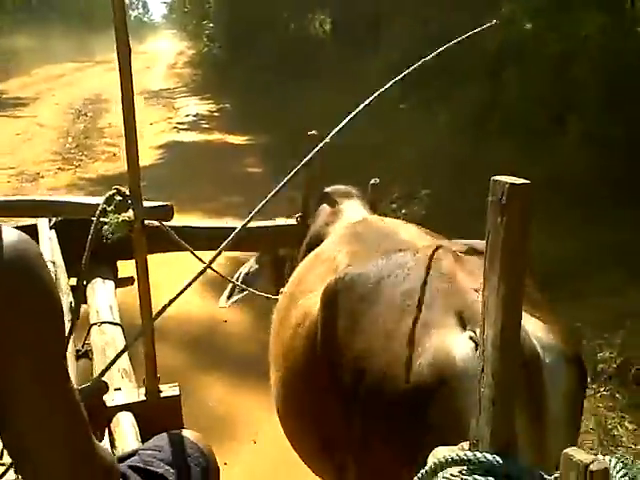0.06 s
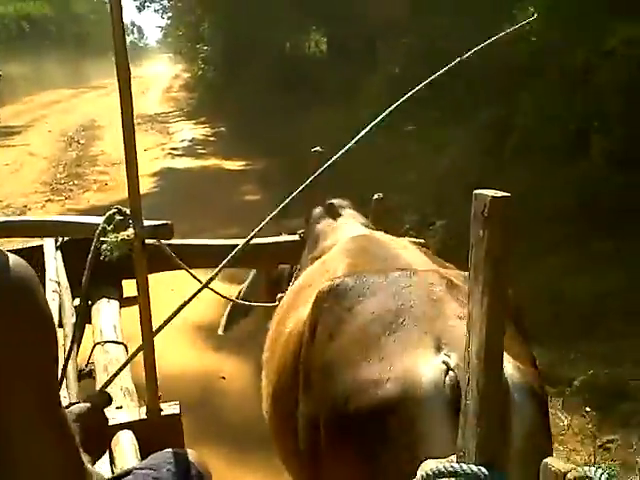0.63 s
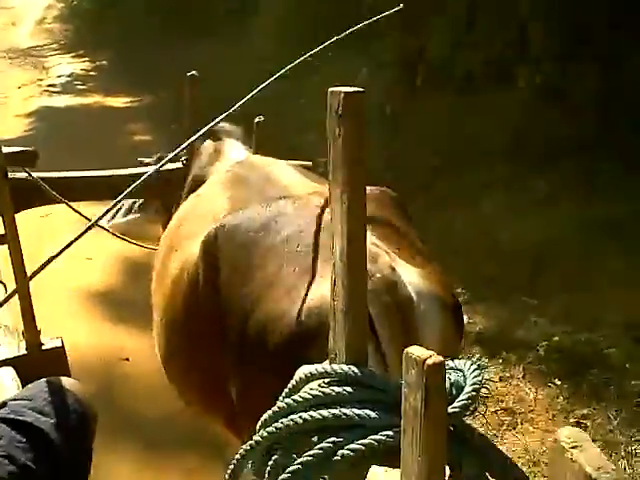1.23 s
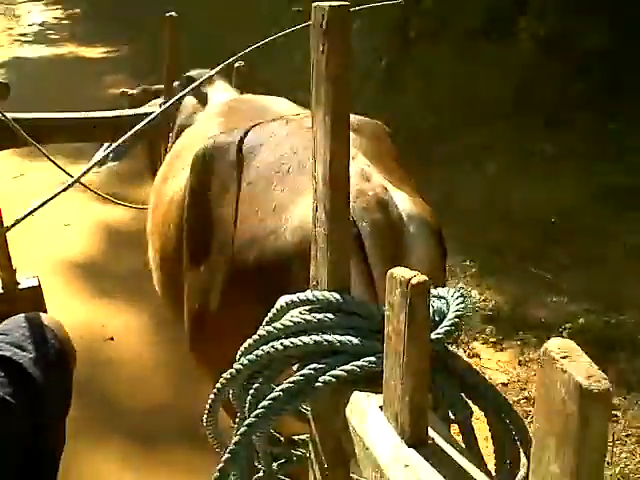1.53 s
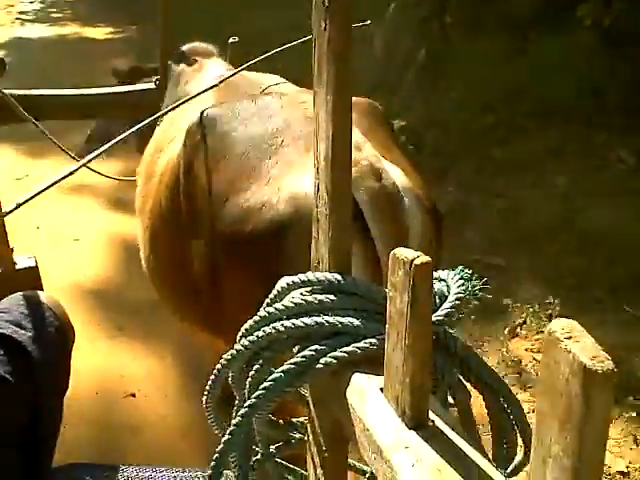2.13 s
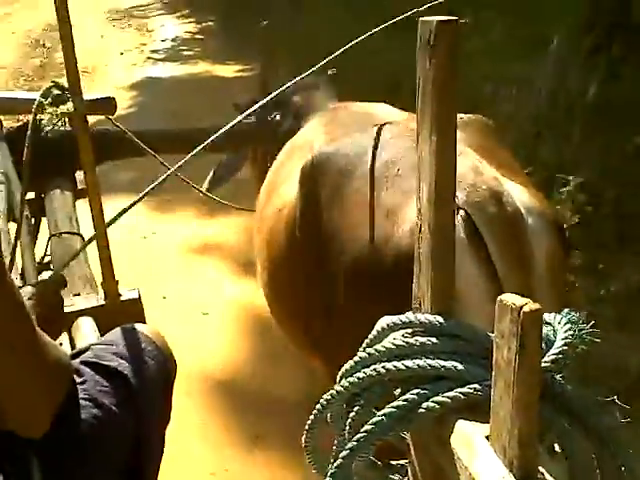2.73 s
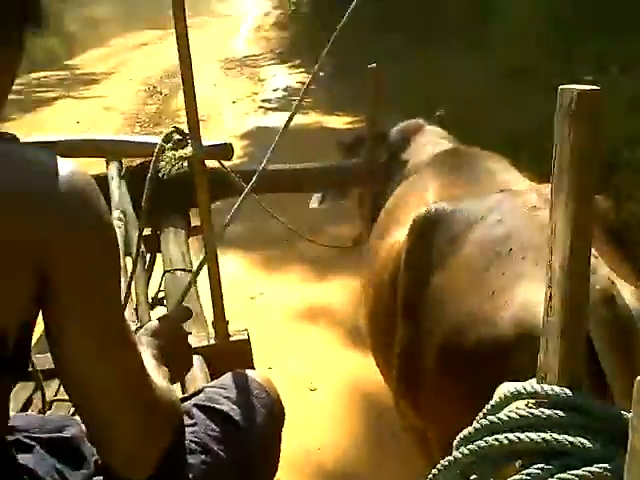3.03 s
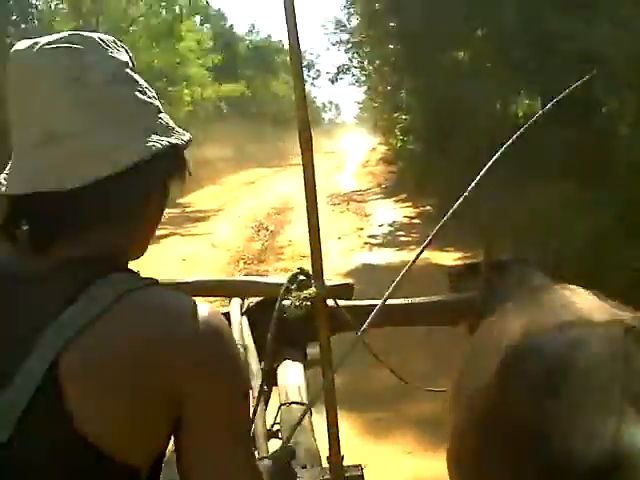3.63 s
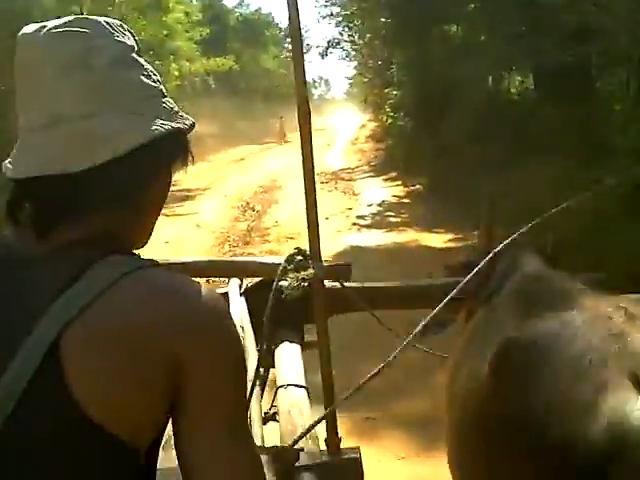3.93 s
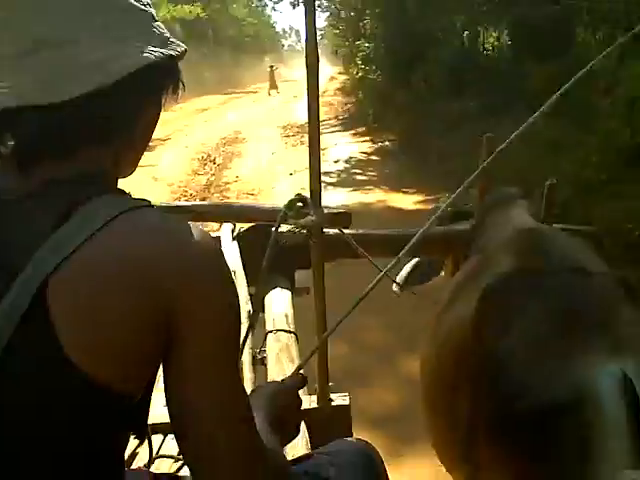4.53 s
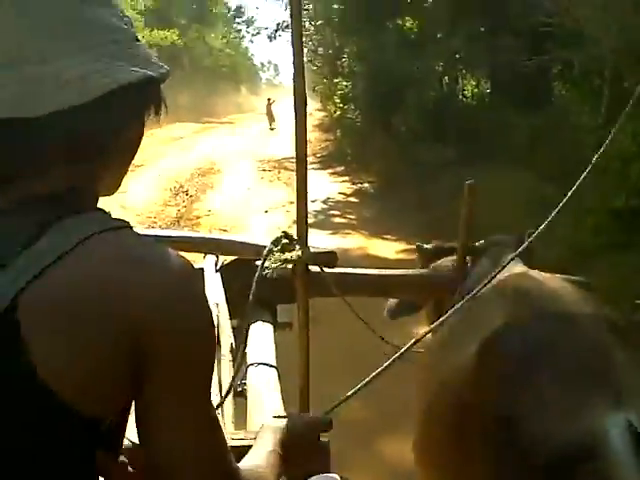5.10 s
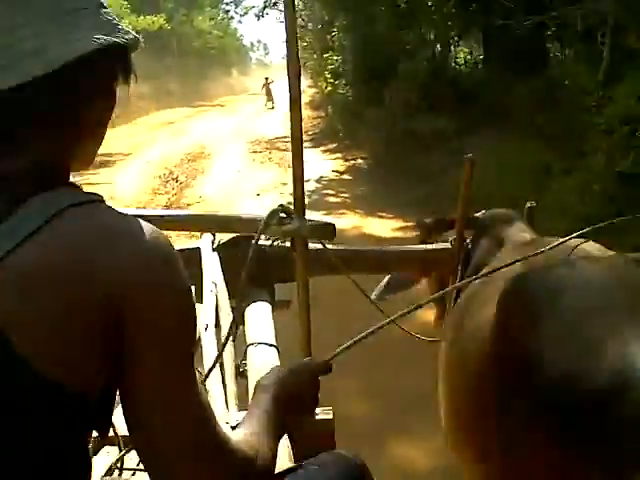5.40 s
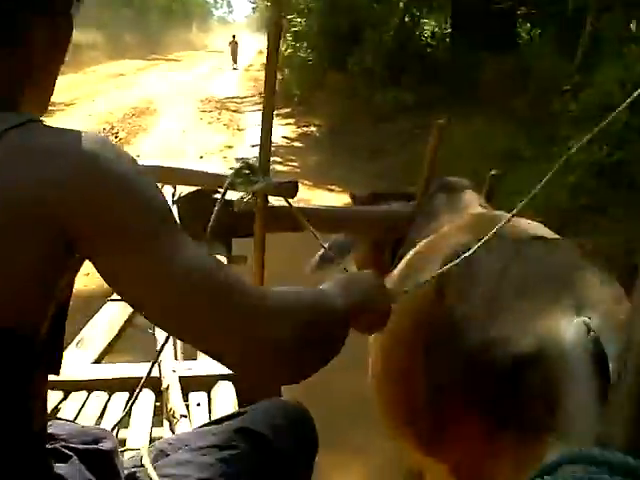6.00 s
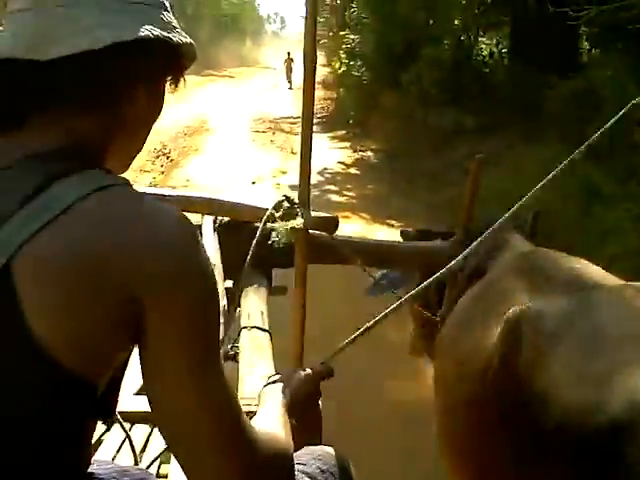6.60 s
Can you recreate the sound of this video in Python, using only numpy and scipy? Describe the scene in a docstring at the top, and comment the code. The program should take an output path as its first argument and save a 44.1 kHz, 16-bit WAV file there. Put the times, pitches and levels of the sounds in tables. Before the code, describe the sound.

Light, uneven wooden clicks and knocks come from a cart moving over dirt, with soft rattling, gritty wheel noise and a faint rumble underneath. Past the middle, a louder double knock is followed by sharp taps and snaps. A taut rope gives several brief creaks against the wood, and two firm knocks come near the end. The sound is close and dry, heard outdoors from aboard the cart.

```python
"""A dirt track, heard from the seat of a rolling wooden ox cart. Every jolt slams a loose joint shut,
makes it chatter and rings the frame. Between jolts small parts rattle, the wheels grind the dust and
the cart bed rumbles. A taut rope lashing creaks five times as it slips over the wood, and a few dry
taps and snaps sound close by."""
import sys
import numpy as np
from scipy.fft import rfft, irfft, next_fast_len
from scipy.io import wavfile
from scipy.ndimage import map_coordinates

SR = 44100
rng = np.random.default_rng(int(sys.argv[2]) if len(sys.argv) > 2 else 0)


def unload_wav(signal):
    """Save mono or channel-first audio to the path in sys.argv[1] as 16-bit WAV at rate SR, clipped to [-1, 1]."""
    wavfile.write(
        sys.argv[1],
        SR,
        np.round(np.clip(np.atleast_2d(signal).T, -1, 1) * 32767).astype(np.int16),
    )


N = 297675

# broad clatter of the frame's many lesser modes: f/Hz, level/dB
CLATTER = [(45, -55), (150, -14), (350, -8.5), (520, -1.5), (1000, 13), (1600, 3.5), (2000, -1.5),
           (2700, 0), (3600, -3), (4050, -12), (6300, -14.5), (8500, -20.5), (11000, -29), (16000, -35)]
MIDDLE_RING_HZ = 922  # where a typical beam rings


def amp(db):
    """Decibels to gain."""
    return 10 ** (np.asarray(db) / 20)


def unit(x):
    """x at rms 1."""
    return x / np.sqrt(np.mean(x ** 2) + 1e-20)


def colour(points, hz):
    """Gain of an EQ curve through (f/Hz, level/dB) points on a log axis."""
    f, db = np.transpose(points)
    return amp(np.interp(np.log(hz + 1), np.log(f), db))


def causal(gain):
    """The minimum-phase response that has this gain."""
    cepstrum = irfft(np.log(np.maximum(gain, 1e-6)))
    half = len(cepstrum) // 2
    return np.exp(rfft(cepstrum * np.r_[1, np.full(half - 1, 2), 1, np.zeros(half - 1)]))


def band(hz, lo, hi, order=6):
    """Gain of a band-pass."""
    return 1 / np.sqrt((1 + (lo / (hz + 1)) ** (2 * order)) * (1 + (hz / hi) ** (2 * order)))


def filtered(x, response):
    """x through a frequency response."""
    size = 2 * next_fast_len(N // 2 + SR // 4)
    return irfft(rfft(x, size) * response(np.fft.rfftfreq(size, 1 / SR)), size)[:N]


def wobble(rate):
    """A smooth random curve, rate knots a second."""
    knots = rng.standard_normal(int(N * rate / SR) + 4)
    return map_coordinates(knots, [np.arange(N) * rate / SR])


def add(track, s, sound):
    """Mix a sound into a track at time s."""
    start = max(round(s * SR), 0)
    track[start:start + len(sound)] += sound[:max(len(track) - start, 0)]


def contacts(size, rate, spread_db, rub):
    """Tiny impacts of random strength, rate a second, over a share of smooth rubbing."""
    hits = rng.random(size) < rate / SR
    strength = amp(spread_db * np.clip(rng.standard_normal(size), -2, 2))
    return unit(hits * strength * rng.choice([-1, 1], size)) + rub * rng.standard_normal(size)


def resonance(hz, centre_hz, width_hz):
    """Response of one damped mode."""
    return 1j * hz * width_hz / (centre_hz ** 2 - hz ** 2 + 1j * hz * width_hz)


def frame_modes(hz):
    """One response for each mode of the wooden frame, neighbours opposite in sign."""
    # the frame's resonances: f/Hz, width/Hz, level/dB
    modes = [(536.6, 27, 3), (601.6, 16.6, 1), (740, 27, 3.5), (797.6, 22.4, 6.5), (898, 41, 2.5),
             (1044.7, 35, 11), (1095, 20, -5.5), (1370, 13, -9), (1380, 19, 3.5), (1578, 42, 3),
             (1671, 49, -2.5), (2225, 54, -4.5), (2323, 85, -11.5), (2537, 45, -2), (2647, 213, -6),
             (3213, 97, -5.5), (3360, 180, -5.5), (3450, 42, -11), (5160, 47, -17), (5820, 56, -25.5),
             (6440, 9, -49), (8500, 26, -27)]
    return np.array([(-1) ** k * amp(db) * resonance(hz, f, width)
                     for k, (f, width, db) in enumerate(modes)])


def shake_db(s):
    """How hard the cart shakes at times s: rattle and rumble levels."""
    # fader moves along the track: t/s, rattle level/dB, rumble level/dB
    faders = [(0.0, -55, -74), (0.28, -56, -69), (0.58, -59, -74.5), (0.98, -55.5, -66), (1.3, -60, -70),
              (1.52, -52.5, -70.5), (2.18, -55, -69.5), (3.53, -55.5, -67.5), (3.87, -50, -70.5),
              (4.4, -58, -65.5), (4.55, -55, -68), (4.74, -52.5, -68.5), (5.22, -51.5, -62.5),
              (5.66, -45.5, -58), (5.98, -49, -63), (6.37, -53, -61.5), (6.47, -48.5, -66),
              (6.75, -53.5, -64)]
    times, *levels = np.transpose(faders)
    return [np.interp(s, times, level) for level in levels]


def bed_rumble():
    """A stream of small knocks keeps the cart bed rumbling."""
    # low boom of the bed: f/Hz, level/dB
    boom = [(20, -41), (50, -33), (90, -12.5), (150, -6.5), (260, 2.5), (400, 2.5), (700, -35),
            (2000, -104)]
    knocks = contacts(N, rate=450, spread_db=-1, rub=0.38)
    return unit(filtered(knocks, lambda hz: causal(colour(boom, hz))))


def wheel_grind(rattle, surge, grind_db=-4, dust_db=-65, middle_rattle_db=-53.5):
    """The rims grind the dirt and crush more dust where the cart shakes more."""
    # tone of wheels on dirt: f/Hz, level/dB
    dirt = [(150, -26), (300, -14), (600, -2.5), (1000, -0.5), (1500, -6.5), (2000, -16.5), (3200, -16),
            (4600, -22.5), (6500, -25), (9000, -30), (12000, -42), (16000, -45)]
    rims = unit(filtered(rng.standard_normal(N), lambda hz: colour(dirt, hz)))
    grains = contacts(N, rate=1800, spread_db=-3.5, rub=0.77)
    dust = unit(filtered(grains, lambda hz: causal(colour(dirt, hz) * band(hz, 1860, 20000))))
    crush = amp(dust_db) * (rattle / amp(middle_rattle_db)) ** 0.26
    # soft dust follows the surges only half as far in dB
    return surge * rattle * amp(grind_db) * rims + np.sqrt(surge) * crush * dust


def loose_parts(clatter_db=-14):
    """Small parts bounce on the frame and ring its modes."""
    bounces = contacts(N, rate=210, spread_db=13.5, rub=0.12)
    wood = lambda hz: frame_modes(hz).sum(0) + amp(clatter_db) * causal(colour(CLATTER, hz))
    return unit(filtered(bounces, wood))


def rolling(rattle_db=-4, rumble_db=-1):
    """The rolling texture: rattle and grind come in uneven surges over the rumble."""
    rattle, rumble = amp(shake_db(np.arange(N) / SR))
    surge = amp(1.4 * wobble(28) + 2.23 * wobble(80))
    parts = surge * rattle * amp(rattle_db) * loose_parts()
    return parts + wheel_grind(rattle, surge) + amp(rumble_db) * rumble * bed_rumble()


def rope_creaks(jitter=0.013, rasp=1.86, width_hz=90, scrape_db=-17, harmonics=8):
    """A taut lashing slips roughly over the wood, rings on its harmonics, swells and lets go."""
    # pulls on the lashing: peak t/s, level/dB, pitch f/Hz, rise/s, fall/s
    pulls = [(5.42, -25, 633, 0.0035, 0.0023), (5.482, -29.5, 871, 0.0078, 0.0012),
             (5.683, -32.5, 780, 0.006, 0.004), (5.766, -27, 581, 0.0039, 0.0028),
             (5.823, -19, 848, 0.0034, 0.0039)]
    # tone of the creak: f/Hz, level/dB
    tone = [(200, -13), (600, -1), (900, 5), (1700, -4.5), (2600, 3.5), (3400, 0), (3900, -15),
            (5200, -17), (6800, -13), (9000, -13.5), (16000, -31)]
    size = 2 ** 13
    t, hz = np.arange(N) / SR, np.fft.rfftfreq(size, 1 / SR)
    waver = 1 + jitter * wobble(400)
    out = np.zeros(N)
    for s, db, pitch_hz, rise, fall in pulls:
        slips = np.diff(np.floor(np.cumsum(pitch_hz * waver) / SR), prepend=0)  # one pulse a cycle
        pull = np.exp(-np.maximum((s - t) / rise, (t - s) / fall))
        friction = pull * (unit(slips - slips.mean()) + rasp * rng.standard_normal(N))
        rope = sum((-1) ** k * resonance(hz, k * pitch_hz, width_hz) for k in range(1, harmonics + 1))
        response = (rope + amp(scrape_db)) * causal(colour(tone, hz))
        start = round(s * SR) - SR // 20
        creak = irfft(rfft(friction[start:start + size]) * response)
        add(out, start / SR, amp(db) * np.linalg.norm(pull) * creak / np.linalg.norm(creak))
    return out


def close_taps(snap_t60=0.0073, attack_s=0.00035, overtone_ratio=2.41):
    """A tap is a brief snap and a few damped cycles; small things radiate little below their ring."""
    # taps, snaps and clinks: t/s, ring level/dB, ring f/Hz, t60/s, overtone re ring/dB,
    # snap level/dB, low cut f/Hz
    taps = [(0.184, -54, 233, 0.053, -12, -70, 170), (1.983, -35, 267, 0.046, 1, -52, 190),
            (2.845, -49.5, 1880, 0.078, -9, -70, 1200), (3.166, -30, 1200, 0.0067, -25, -63, 450),
            (4.226, -48, 205, 0.045, -14, -70, 150), (4.9437, -6.5, 630, 0.0088, 2.5, -8, 155),
            (4.9563, -32, 710, 0.016, 4, -21.5, 300), (4.9739, -10.5, 504, 0.0032, -8, -36, 200),
            (5.005, -32.5, 2840, 0.037, -21, -35, 2000), (5.035, -9, 740, 0.011, -18, -9.5, 560),
            (5.075, -2, 463, 0.0038, -6.5, -56, 140), (5.093, -32, 304, 0.033, 3.5, -28.5, 150),
            (5.8259, 1.5, 734, 0.0051, -16, -48, 260), (5.969, -23.5, 583, 0.011, -22, -63, 150),
            (6.0609, -31, 3870, 0.018, -10, -30, 2500), (6.089, -23, 2990, 0.017, -19, -21.5, 2600),
            (6.228, -23.5, 570, 0.018, -16, -60, 151), (6.346, -35, 524, 0.016, -7, -52, 150)]
    # tone of the snap: f/Hz, level/dB
    crisp = [(200, -23), (1000, -9), (3200, 5), (4800, -4), (7000, -3.5), (9000, -10),
             (11000, -19.5), (16000, -28)]
    size = 2 ** 12
    t, hz = np.arange(size) / SR, np.fft.rfftfreq(size, 1 / SR)
    out = np.zeros(N)
    for s, db, ring_hz, t60, overtone_db, snap_db, low_cut_hz in taps:
        phase = 2 * np.pi * ring_hz * t
        cycles = np.sin(phase) - amp(overtone_db) * np.sin(overtone_ratio * phase)
        ring = amp(db - 60 * t / t60) * (1 - np.exp(-t / attack_s)) * cycles
        snap = amp(snap_db - 60 * t / snap_t60) * rng.standard_normal(size)
        body = rfft(ring) * causal(band(hz, low_cut_hz, 7600, order=4))
        edge = rfft(snap) * causal(colour(crisp, hz) * band(hz, 0.45 * ring_hz, SR))
        add(out, s, irfft(body + edge))
    return out


def faint_bumps(count=32, over_db=3, spread_db=2.5, spread_octaves=0.1, t60=0.08, crack_db=-3):
    """Small bumps in the track come by chance, a little over the rattle: extra cues for frame_jolts."""
    times = rng.random(count) * N / SR
    strength, detune = rng.standard_normal((count, 2)).T
    levels = shake_db(times)[0] + over_db + spread_db * strength
    rings_hz = MIDDLE_RING_HZ * 2 ** (spread_octaves * detune)
    return [(s, db, t60, ring_hz, crack_db) for s, db, ring_hz in zip(times, levels, rings_hz)]


def frame_jolts(clatter_db=-6, vary_db=3, favour_db=6, favour_octaves=0.081,
                rise_s=0.0018, lead_s=0.009, close_s=0.0023, sustain=1.068, middle_db=-35.5):
    """Each jolt is a hard blow and a burst of chatter in a joint, ringing the frame's modes unevenly."""
    # jolts of the frame: t/s, body level/dB, t60/s, main ring f/Hz, crack re body/dB
    cues = [(0.127, -47, 0.038, 1080, -4), (0.180, -46.5, .16, 950, -4.5), (0.197, -40, 0.029, 1070, -6),
            (0.283, -37.5, 0.19, 1030, -7.5), (0.313, -37, 0.045, 1050, -18),
            (0.355, -40, 0.063, 830, -1.5), (0.382, -43, 0.073, 940, -9), (0.479, -46, 0.11, 845, -5.5),
            (0.516, -41.5, 0.047, 850, -3.5), (0.704, -37, 0.07, 1120, -10), (1.047, -37, 0.078, 824, -3.5),
            (1.238, -50, 0.026, 725, -1.5), (1.33, -43, 0.1, 1050, -10), (1.374, -46.5, 0.16, 960, -3.5),
            (1.478, -34.5, 0.048, 750, -8), (1.611, -38.5, 0.14, 1030, -5), (1.648, -34, 0.081, 666, -5.5),
            (1.706, -43.5, 0.13, 1550, -10), (1.778, -48, 0.055, 910, -4), (1.851, -46.5, 0.13, 850, -5.5),
            (1.947, -51, 0.37, 790, -4), (1.982, -30.5, 0.061, 820, -6), (2.044, -34.5, 0.16, 754, -13.5),
            (2.074, -48, 0.15, 810, -0.5), (2.169, -47.5, 0.055, 805, -2.5),
            (2.255, -36.5, 0.037, 900, -9.5), (2.296, -42.5, 0.056, 1390, -7),
            (2.33, -31, 0.15, 1030, -10.5), (2.505, -50.5, 0.016, 830, -12), (2.568, -32.5, 0.19, 830, -8),
            (2.615, -40.5, 0.065, 1000, 0), (2.683, -47, 0.28, 865, -3), (2.727, -37.5, 0.038, 890, -5),
            (2.870, -47, 0.15, 960, -7.5), (2.976, -39, 0.063, 875, -7), (3.119, -42, .13, 557, -4),
            (3.205, -49, .3, 910, -8.5), (3.243, -46, 0.28, 1000, -8), (3.504, -46.5, 0.22, 870, -10.5),
            (3.623, -42.5, 0.043, 1080, -7), (3.666, -33, 0.12, 1080, -8), (3.802, -40.5, .15, 950, -2.5),
            (3.919, -40, 0.16, 980, -6), (3.936, -34, 0.095, 920, -2.5), (4.021, -40.5, 0.06, 830, -9),
            (4.044, -36.5, .11, 1130, -5), (4.129, -36.5, 0.1, 1120, -9.5),
            (4.352, -18.5, 0.091, 936, -9.5), (4.368, -18.5, 0.044, 1030, -4.5),
            (4.398, -38, 0.16, 1000, -5), (4.466, -41.5, 0.057, 1060, -9.5),
            (4.509, -28.5, 0.048, 970, -9.5), (4.543, -34.5, 0.042, 1018, -10.5),
            (4.604, -38, 0.079, 920, -5), (4.640, -44, 0.13, 1040, -4.5), (4.718, -40.5, 0.088, 1090, -5),
            (4.771, -49.5, 0.054, 870, 1), (4.795, -42, 0.023, 1080, -8), (4.916, -43, 0.27, 543, -10.5),
            (5.155, -39.5, 0.079, 1050, -0.5), (5.211, -38, 0.078, 930, -3.5), (5.261, -41, 0.1, 970, -1.5),
            (5.511, -33, 0.12, 980, -4), (5.565, -37, 0.018, 850, -15), (5.623, -32, 0.059, 1100, -13),
            (5.663, -37.5, 0.28, 1580, -5.5), (5.700, -30.5, 0.027, 1230, -5.5),
            (5.865, -43.5, 0.04, 1030, -8), (6.146, -41, 0.054, 705, -9), (6.176, -29, 0.034, 1050, -9),
            (6.219, -40.5, 0.23, 660, -9.5), (6.289, -33, 0.063, 1080, -16.5),
            (6.363, -30.5, 0.054, 980, -6), (6.465, -17, 0.059, 1240, -9.5),
            (6.706, -17, 0.043, 1110, -7.5)]
    # body, thud, crack and grit bands: low f/Hz, high f/Hz
    band_edges = [(700, 2000), (1, 700), (2000, 3900), (3900, 30000)]
    size = 10800
    t, hz = np.arange(size) / SR, np.fft.rfftfreq(size, 1 / SR)
    modes, clatter = frame_modes(hz), amp(clatter_db) * causal(colour(CLATTER, hz))
    bands = np.array([band(hz, lo, hi, order=8) ** 2 for lo, hi in band_edges])
    since_blow = t - lead_s
    closing = np.exp(np.minimum(since_blow, 0) / rise_s)  # the joint scrapes shut ahead of the blow
    out = np.zeros(N)
    for s, db, t60, ring_hz, crack_db in cues + faint_bumps():
        # sustain over 1 holds the chatter, then drops it
        force = closing * amp(-60 * (np.maximum(since_blow, 0) / t60) ** sustain)
        chatter = force * contacts(size, rate=1500, spread_db=4, rub=0.42)
        # the more a jolt cracks, the harder its blow lands
        blow = amp(-8 + 0.7 * crack_db) * np.linalg.norm(chatter) * np.exp(-2j * np.pi * hz * lead_s)
        # the chatter is softer than the blow, but hardens in a strong jolt
        top_hz = 5000 * 2 ** (0.03 * (db - middle_db))
        strike = blow + rfft(chatter) / (1 + 1j * hz / top_hz)
        # the struck beam favours the modes near its main ring and adds small resonances of its own
        own_db = 3 * map_coordinates(rng.standard_normal(SR // 200), [hz / 110])
        ring_db = favour_db / (1 + (np.log2((hz + 1) / ring_hz) / favour_octaves) ** 2)
        beam = causal(amp(own_db + ring_db))
        # where the blow lands decides how each mode answers
        frame = amp(vary_db * rng.standard_normal(len(modes))) @ modes + clatter
        wood = strike * beam * frame
        # low-ringing beams thud more; light, cracking jolts are grittier
        thud_db = -10.5 - 12.5 * np.log2(ring_hz / MIDDLE_RING_HZ)
        grit_db = -9.5 + 0.61 * crack_db - 0.26 * (db - middle_db)
        levels = amp(db + np.array([0, thud_db, crack_db, grit_db]))
        eq = (levels / np.linalg.norm(irfft(wood * bands), axis=1)) @ bands
        add(out, s + close_s - lead_s, np.linalg.norm(force) * irfft(wood * causal(eq)))
    return out


def scene():
    """The cart in the open air, mono and without echo."""
    return (frame_jolts() + rolling() + rope_creaks() + close_taps())[None]


def record(dry):
    """A faint steady hiss joins the mix and the very top is cut away."""
    hiss_db, top_hz = -84.5, 15900
    hissy = dry + amp(hiss_db) * rng.standard_normal(dry.shape)
    return np.array([filtered(channel, lambda hz: hz < top_hz) for channel in hissy])


dry = scene()
out = record(dry)
unload_wav(out)
```